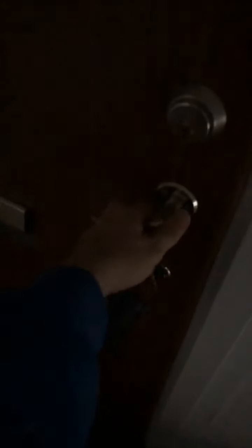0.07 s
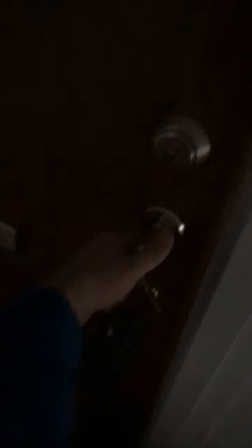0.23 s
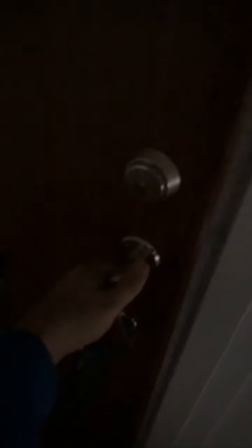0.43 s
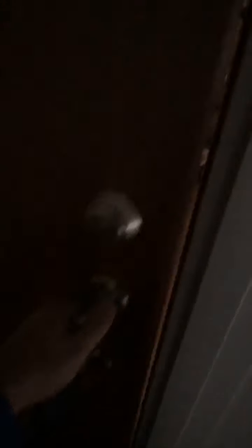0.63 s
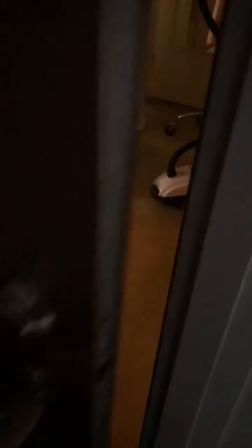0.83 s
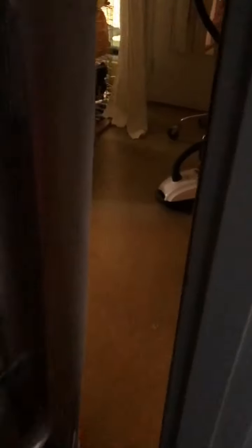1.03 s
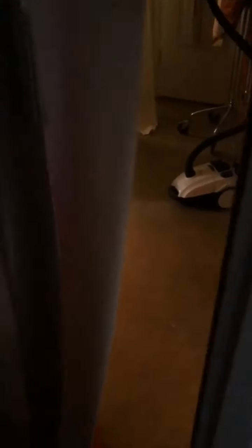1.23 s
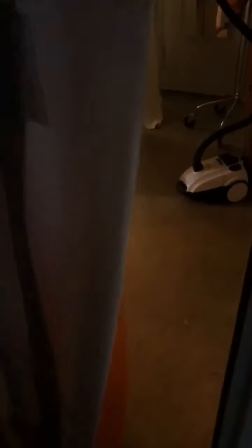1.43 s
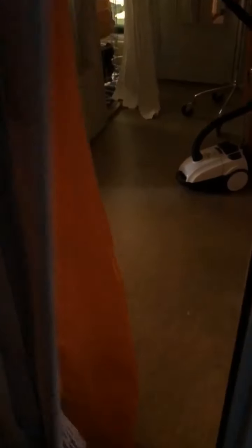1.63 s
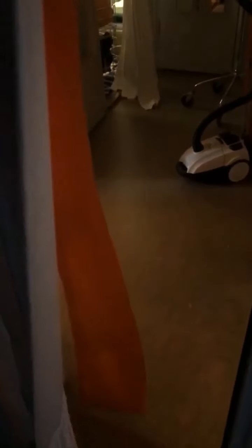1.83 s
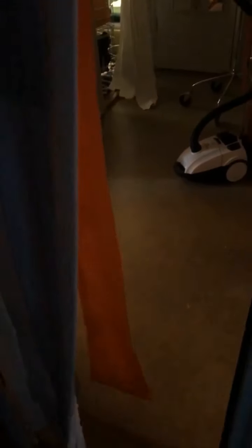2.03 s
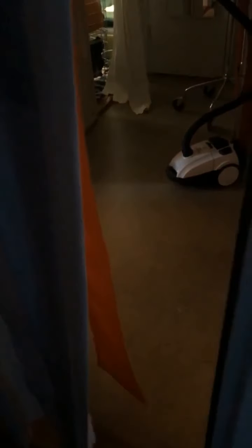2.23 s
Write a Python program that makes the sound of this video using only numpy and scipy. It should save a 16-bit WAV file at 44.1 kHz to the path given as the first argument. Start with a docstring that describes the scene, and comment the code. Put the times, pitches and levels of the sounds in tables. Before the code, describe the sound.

A front door latch opens: a light touch at 0.05 s, then a sharp, bright metallic snap and rattle by 0.1 s, echoing in a hard hallway. Sleeve rustle and airy door swish follow. The handle clacks at 0.9 s, with smaller knocks at 1.35 and 1.5 s. Faint tinkles and foot scuffs come near 1.9-2.1 s; cloth rustles loudest at the end. Low air rumble buffets the close microphone.

```python
"""A front door is opened at arm's length, with air rumbling on the hand-held microphone (shaped noise).
At once the latch snaps back: noise cracks and damped metal modes, echoed by a hard hallway (decaying noise).
A sleeve rustles and the door swishes (uneven friction noise), then handle and door knock: clacks with a body mode.
Late on, a small metal piece (a zip pull, perhaps) tinkles in fluttering modes, feet scuff in brief noise,
and the sleeve rustles loudest."""
import sys
import numpy as np
from scipy import signal
from scipy.fft import rfft, irfft, next_fast_len
from scipy.io import wavfile

SR = 44100
rng = np.random.default_rng(int(sys.argv[2]) if len(sys.argv) > 2 else 0)


def generate_wav(signal):
    """Clip the signal to [-1, 1] and save it as 16-bit WAV at the path in sys.argv[1]."""
    frames = np.transpose(np.atleast_2d(signal))
    scaled = np.clip(frames, -1, 1) * 32767
    pcm = np.round(scaled).astype(np.int16)
    wavfile.write(sys.argv[1], SR, pcm)


N = 101033
HIT_SAMPLES = 16384
CONTACT_RISE_S = 0.0004
SMALL_HALL_DB = -10  # scuff echo re direct sound

# latch contacts: start_s, level_db, contact_t60_s, ring_db (re contact)
LATCH_CONTACTS = [(0.05, -31.5, 0.064, -16), (0.0626, -27, 0.11, 1), (0.087, -25, 0.013, -11),
                  (0.0904, -15.5, 0.02, 8.5), (0.0944, -17, 0.064, -25), (0.0974, -26, 0.061, -24.5)]
# latch bolt and plate: mode_hz, level_db, t60_s
LATCH_MODES = [(1071, -17, 0.079), (1446, -16.5, 0.06), (3930, -14, 0.024), (4268, -8.5, 0.024),
               (5100, -1, 0.008), (5710, -14, .035), (7900, -8, 0.0052), (10660, -3.5, 0.013),
               (11400, -7.5, 0.013), (13280, -6.5, 0.016)]
# crack spectrum: freq_hz, level_db
LATCH_COLOUR = [(100, -24), (260, 10.5), (600, -3), (1300, -0.5), (2600, 2.5), (4200, 3.5), (5600, 4),
                (7000, -1.5), (12000, -6), (15500, -6.5)]
# strike plate under the first touch: mode_hz, level_db, t60_s
PLATE_MODES = [(1000, -35, .08), (2860, -32, 0.06), (6000, -33, 0.052)]
# lingering door and lock: mode_hz, level_db, t60_s
DOOR_MODES = [(259, -32.5, 0.3), (1070, -32, 0.18), (1490, -51, 0.98), (3264, -50.5, 0.28),
              (3960, -52, 0.65), (4265, -52.5, 0.73), (5100, -43, 0.3), (5860, -37, 0.39)]
# latch spectrum returned by the hallway: freq_hz, level_db
LATCH_ECHO_COLOUR = [(100, 13.5), (300, 2), (650, 3), (1500, 2), (2600, 0.5), (4200, 1.5), (5600, -3),
                     (7000, -2.5), (9500, -4.5), (11000, -5.5), (15500, -12)]
LATCH_HALL_DB = -15  # re direct sound


def latch():
    """Bolt touches, snaps free, rattles: each contact cracks and rings metal, the hardest rings the door."""
    direct = np.zeros(N)
    for start_s, level_db, t60_s, ring_db in LATCH_CONTACTS:
        crack = burst(LATCH_COLOUR, t60_s, CONTACT_RISE_S)
        metal = undb(ring_db) * ring(LATCH_MODES)
        direct += place(undb(level_db) * (crack + metal), start_s)
    first_s = LATCH_CONTACTS[0][0]
    snap_s = max(LATCH_CONTACTS, key=lambda row: row[1] + row[3])[0]  # strongest ring
    rings = place(ring(PLATE_MODES), first_s) + place(ring(DOOR_MODES), snap_s)
    blows = [(start_s, level_db + LATCH_HALL_DB) for start_s, level_db, _, _ in LATCH_CONTACTS]
    return direct + rings + hallway(blows, LATCH_ECHO_COLOUR)


# handle and door knocks: start_s, level_db, contact_t60_s, body_hz, body_db (re level),
# treble_db_per_octave (above 1 kHz), hall_db (re level)
KNOCKS = [(0.9083, -26.5, 0.016, 1906, 4.5, 0.5, -19), (0.91, -26, 0.042, 1230, -6.5, -1.5, -22),
          (0.943, -45.5, 0.067, 1390, 14.5, -4, -7), (1.356, -39, 0.034, 2040, 2, -10, -17.5),
          (1.504, -26, 0.014, 1554, -5.5, 0, -21.5)]
# clack spectrum: freq_hz, level_db
KNOCK_COLOUR = [(100, -6), (400, -10), (800, -8), (1500, -11.5), (2600, -10), (3500, 1), (5000, -7),
                (6500, -4), (8200, -6.5), (10000, -11), (15500, -13)]
# handle springing back: mode_hz, level_db, t60_s
HANDLE_MODES = [(1262, -37, 0.083), (3095, -30, 0.039), (5010, -32, 0.024), (6940, -30, 0.023),
                (8150, -28, .02)]
# thin metal on the door: mode_hz, level_db, t60_s
PING_MODES = [(5500, -51, 0.39)]
# knock spectrum returned by the hallway: freq_hz, level_db
KNOCK_ECHO_COLOUR = [(100, -0.5), (500, -7), (1500, 4), (2800, -4), (4000, -2.5), (5200, -7), (8000, -7),
                     (15500, -13)]
BODY_T60_S = 0.03


def knocks():
    """Short clacks, one body resonance each; the first rings the handle, the last a thin metal part."""
    direct, blows = np.zeros(N), []
    for start_s, level_db, t60_s, body_hz, body_db, treble_db_per_octave, hall_db in KNOCKS:
        clack = burst(KNOCK_COLOUR, t60_s, CONTACT_RISE_S, treble_db_per_octave)
        body = ring([(body_hz, body_db, BODY_T60_S)])
        direct += place(undb(level_db) * (clack + body), start_s)
        blows.append((start_s, level_db + hall_db))
    handle = place(ring(HANDLE_MODES), KNOCKS[0][0])
    ping = place(ring(PING_MODES), KNOCKS[-1][0])
    return direct + hallway(blows, KNOCK_ECHO_COLOUR) + handle + ping


# tinkles: start_s, ring_db, tick_db
TINKLES = [(1.504, -45.5, -52), (1.674, -64, -80), (1.870, -36, -43), (1.874, -40, -51), (1.903, -53, -60),
           (1.939, -59, -67), (1.98, -51, -64), (2.0008, -47, -43.5), (2.1132, -52, -38.5)]
# small metal piece: mode_hz, level_db, t60_s
TINKLE_MODES = [(6736, -10, 0.38), (11740, -2, 0.19), (13620, -9, 0.17)]
# tick spectrum: freq_hz, level_db
TICK_COLOUR = [(500, -15), (5000, -6.5), (6800, 1), (9000, -13), (12000, -1.5), (15500, -11)]
TICK_T60_S = 0.056


def tinkles():
    """A small dangling metal piece ticks and rings with a flutter."""
    out = np.zeros(N)
    for start_s, ring_db, tick_db in TINKLES:
        metal = undb(ring_db) * ring(TINKLE_MODES, rough=0.79)
        tick = undb(tick_db) * burst(TICK_COLOUR, TICK_T60_S, CONTACT_RISE_S)
        out += place(metal + tick, start_s)
    return out


# foot scuffs: start_s, level_db, rise_s, t60_s
SCUFFS = [(1.9, -45.5, 0.0038, 0.11), (2.028, -43, 0.026, 0.49)]
# sole-on-floor spectrum, also of its echo: freq_hz, level_db
SCUFF_COLOUR = [(200, -14), (700, -1.5), (1350, 3.5), (2200, -2), (2850, -1.5), (3500, -1), (4600, 0.5),
                (5600, -6), (7000, -5.5), (10000, -22), (15500, -28)]
SCUFF_ROUGH_DB, SCUFF_GRAIN_HZ = 1.0, 350


def scuffs():
    """Soles brush the hallway floor: noise bursts with an unsteady level, plus echo."""
    direct = np.zeros(N)
    for start_s, level_db, rise_s, t60_s in SCUFFS:
        direct += place(undb(level_db) * burst(SCUFF_COLOUR, t60_s, rise_s), start_s)
    grain = undb(SCUFF_ROUGH_DB * walk(SCUFF_GRAIN_HZ))
    blows = [(start_s, level_db + SMALL_HALL_DB) for start_s, level_db, _, _ in SCUFFS]
    return direct * grain + hallway(blows, SCUFF_COLOUR)


# sleeve rubbing: time_s, level_db
SLEEVE_LEVEL = [(0, -59), (.3, -60), (.42, -51), (.55, -48.5), (.7, -50), (.88, -52), (1.02, -65),
                (1.3, -67), (1.41, -61), (1.48, -60.5), (1.8, -68.5), (1.95, -58), (2.06, -52),
                (2.12, -56.5), (2.2, -44.5), (2.265, -41), (2.29, -41.5)]
# cloth spectrum: freq_hz, level_db
SLEEVE_COLOUR = [(200, -29), (1000, -1), (3000, 1.5), (5000, -2.5), (6300, 0), (8000, 1), (10300, -0.5),
                 (12000, 3.5), (14500, 2), (16000, -1.5)]


def sleeve():
    """Jacket cloth rubs: fine-grained friction noise along a level curve."""
    return follow(SLEEVE_LEVEL) * rub(SLEEVE_COLOUR, rough_db=0.6, grain_hz=500)


# swinging door: time_s, level_db
SWING_LEVEL = [(0, -49.5), (.45, -47.5), (.7, -49.5), (.88, -48), (1.02, -47), (1.22, -48.5), (1.34, -51.5),
               (1.48, -57), (1.75, -75), (2.29, -61)]
# swish spectrum: freq_hz, level_db
SWING_COLOUR = [(150, 10), (600, 2.5), (1000, 1.5), (2000, 3), (2500, 4), (3000, -2.5), (4700, -2.5),
                (5400, -1), (5900, 0), (6400, -4.5), (7500, -10.5), (10000, -16), (15500, -19)]


def swish():
    """The door swings: coarser-grained friction noise along a level curve."""
    return follow(SWING_LEVEL) * rub(SWING_COLOUR, rough_db=0.77, grain_hz=71)


# air buffeting the microphone: time_s, level_db
BUFFET_LEVEL = [(0, -22.5), (.06, -29.5), (.13, -21), (.2, -32), (.33, -33), (.55, -37.5), (.8, -49),
                (1.0, -57), (1.25, -57.5), (1.33, -50), (1.5, -52.5), (1.57, -44.5), (1.68, -46.5),
                (1.79, -34), (1.89, -32), (1.97, -40), (2.02, -50), (2.12, -54), (2.21, -36), (2.29, -45.5)]
# buffet spectrum: freq_hz, level_db
BUFFET_COLOUR = [(10, -14.5), (28, 0), (45, -2.5), (80, -7.5), (110, -17.5), (170, -24), (400, -41),
                 (1500, -43), (8000, -98)]
# steady air spectrum: freq_hz, level_db
AIR_COLOUR = [(30, -6), (150, 3.5), (300, -8), (700, -14.5), (1600, -20), (3500, -24), (6000, -31),
              (15500, -47)]
AIR_DB = -52.5


def moving_air():
    """Air on the microphone: deep rumble along a level curve over a steady noise bed."""
    buffet = follow(BUFFET_LEVEL) * noise(BUFFET_COLOUR)
    return buffet + undb(AIR_DB) * noise(AIR_COLOUR)


# hallway decay: freq_hz, t60_s
HALL_T60 = [(100, 2.4), (700, 1.65), (1800, 1.48), (4000, 1.14), (6500, 0.18), (12800, 0.69)]
# cluster of echoes from near walls; EARLY_DB re tail; the lag delays cluster and tail
EARLY_T60_S, EARLY_DB, WALL_LAG_S = 0.27, 5.5, 0.0046


def hallway(blows, colour):
    """Diffuse echo of (start_s, level_db) blows: a brief near-wall cluster, and a tail with t60 by octave."""
    n, power = next_fast_len(N, True), np.zeros(N)
    for start_s, level_db in blows:
        power[int((start_s + WALL_LAG_S) * SR)] += undb(level_db) ** 2

    def energy(t60_s):
        pole = np.exp(-2 * np.log(1000) / (t60_s * SR))
        return signal.lfilter([1], [1, -pole], power)

    octave = np.log2(np.arange(n // 2 + 1) * SR / n + 1)
    spectrum = rfft(noise(colour, size=n)) * unit(ripple(len(octave)))
    early = undb(EARLY_DB) ** 2 * energy(EARLY_T60_S)
    out = np.zeros(N)
    for k in range(6, 15):  # overlapping bands centred near 2**k Hz
        band = irfft(spectrum * np.maximum(1 - abs(octave - k), 0), n)[:N]
        tail = energy(over_hz(HALL_T60, 2 ** k))
        out += band * np.sqrt(early + tail)
    return out


HALL_RIPPLE_DB, HALL_RIPPLE_HZ = 2.6, 70


def ripple(size):
    """Uneven room response: small peaks and dips across the spectrum."""
    knots_per_s = SR * SR / 2 / size / HALL_RIPPLE_HZ  # one knot per HALL_RIPPLE_HZ of spectrum
    return undb(HALL_RIPPLE_DB * walk(knots_per_s, size=size))


def ring(modes, rough=0):
    """Damped modes struck together; a loose part rattles, so its partials flutter."""
    age_s, out = np.arange(HIT_SAMPLES) / SR, np.zeros(HIT_SAMPLES)
    for hz, level_db, t60_s in modes:
        phase = 2 * np.pi * hz * age_s + rng.uniform(0, 2 * np.pi)
        flutter = rough * np.cos(phase) * walk(285, size=HIT_SAMPLES)
        out += undb(level_db) * fade(t60_s) * (np.sin(phase) + flutter)
    return out


def burst(colour, t60_s, rise_s, tilt=0):
    """Noise of one contact: linear rise times exponential decay."""
    rise = np.minimum(np.arange(HIT_SAMPLES) / SR / max(rise_s, 1e-5), 1)
    return noise(colour, tilt, size=HIT_SAMPLES) * fade(t60_s) * rise


def rub(colour, rough_db, grain_hz):
    """Friction noise of rms 1 that catches and slips as an uneven level."""
    return unit(noise(colour) * undb(rough_db * walk(grain_hz)))


def noise(colour, tilt=0, size=N):
    """Noise of rms 1 with the given spectrum, tilted in dB per octave above 1 kHz."""
    n = next_fast_len(size, True)
    hz = np.arange(n // 2 + 1) * SR / n + 1
    octaves = np.log2(np.maximum(hz / 1000, 1))
    gain = undb(over_hz(colour, hz) + tilt * octaves)
    return unit(irfft(rfft(rng.standard_normal(n)) * gain, n)[:size])


def walk(knots_per_s, size=N):
    """Smooth random wander around zero, rms 1."""
    knots = rng.standard_normal(4096)
    return unit(np.interp(np.arange(size) * knots_per_s / SR, np.arange(len(knots)), knots))


def fade(t60_s):
    """Exponential decay, 60 dB per t60, over one hit."""
    return np.exp(-np.log(1000) * np.arange(HIT_SAMPLES) / SR / max(t60_s, 1e-3))


def follow(curve):
    """Gain along a (time_s, level_db) curve."""
    return undb(np.interp(np.arange(N) / SR, *np.array(curve).T))


def over_hz(points, hz):
    """Read a table on a log-frequency axis."""
    freq_hz, value = np.array(points, float).T
    return np.interp(np.log(np.maximum(hz, 1)), np.log(freq_hz), value)


def place(sound, start_s):
    """Put a short sound at its moment."""
    return np.concatenate([np.zeros(int(start_s * SR)), sound, np.zeros(N)])[:N]


def undb(db):
    """Decibels to gain."""
    return 10 ** (np.asarray(db) / 20)


def unit(x):
    """Scale to rms 1."""
    return x / np.sqrt(np.mean(x ** 2))


def scene():
    """Door hardware and small sounds in the hallway, cloth and air close to the microphone."""
    hardware = latch() + knocks()
    small_sounds = tinkles() + scuffs()
    return (hardware + small_sounds + sleeve() + swish() + moving_air())[None]


TOP_HZ = 15750


def record(dry):
    """The recorder cuts the top: steep elliptic low-pass."""
    low_pass = signal.ellip(10, 0.2, 80, TOP_HZ, fs=SR, output="sos")
    return signal.sosfilt(low_pass, dry)


dry = scene()
out = record(dry)
generate_wav(out)
```